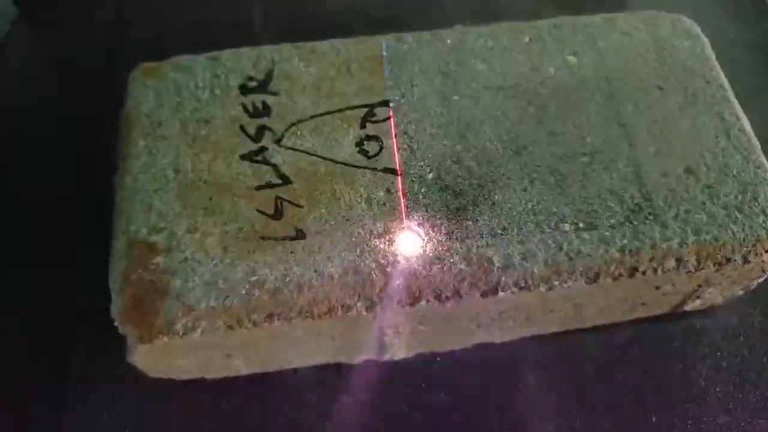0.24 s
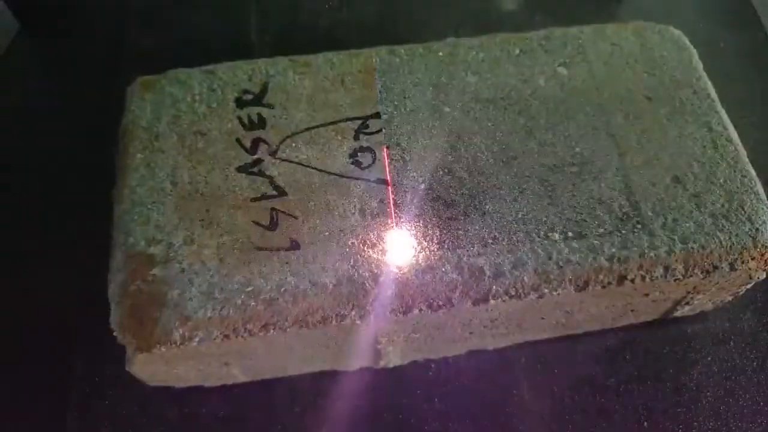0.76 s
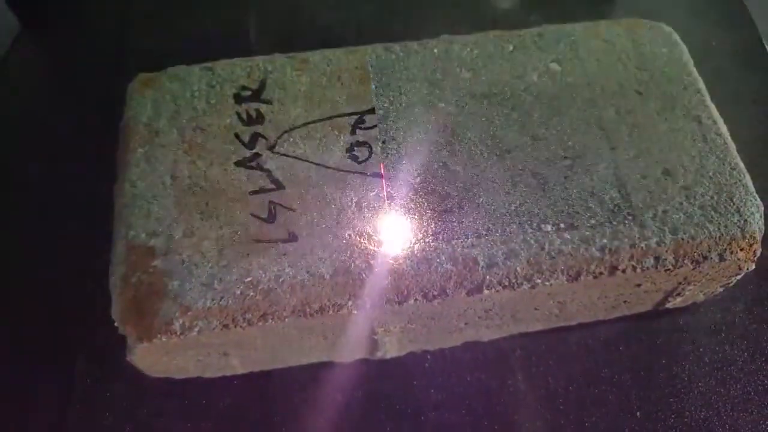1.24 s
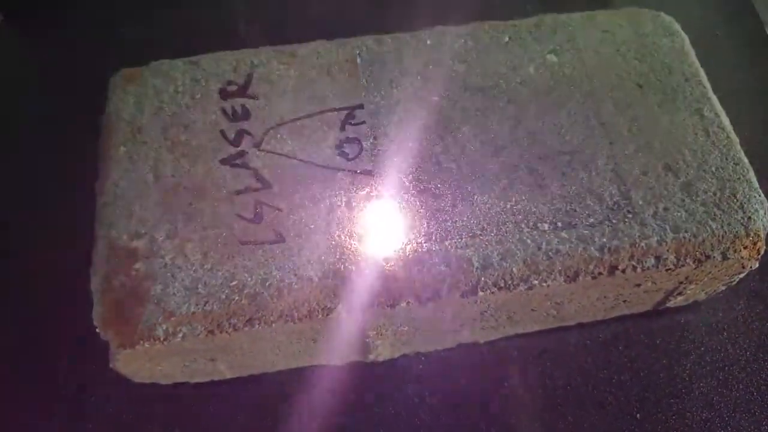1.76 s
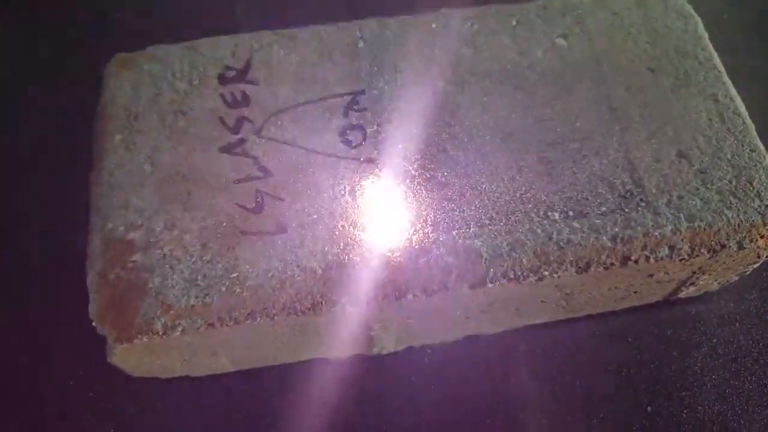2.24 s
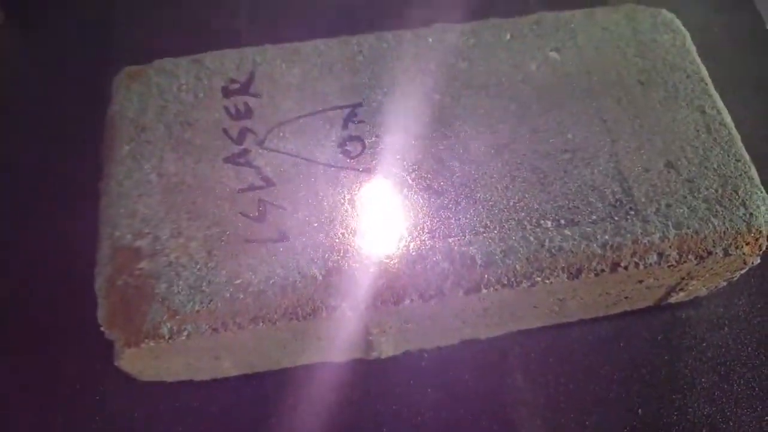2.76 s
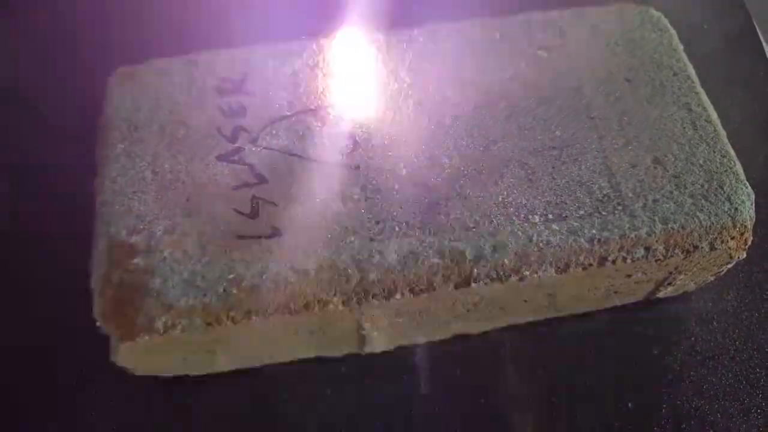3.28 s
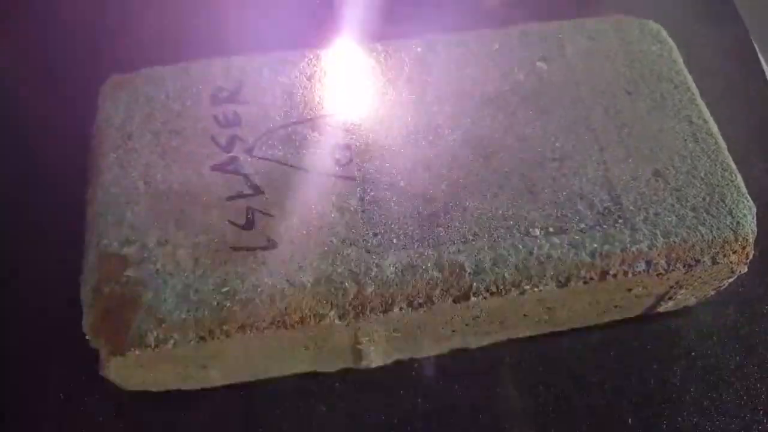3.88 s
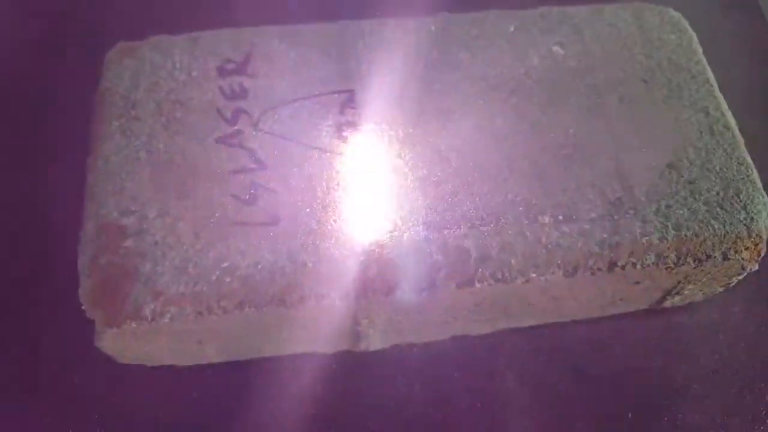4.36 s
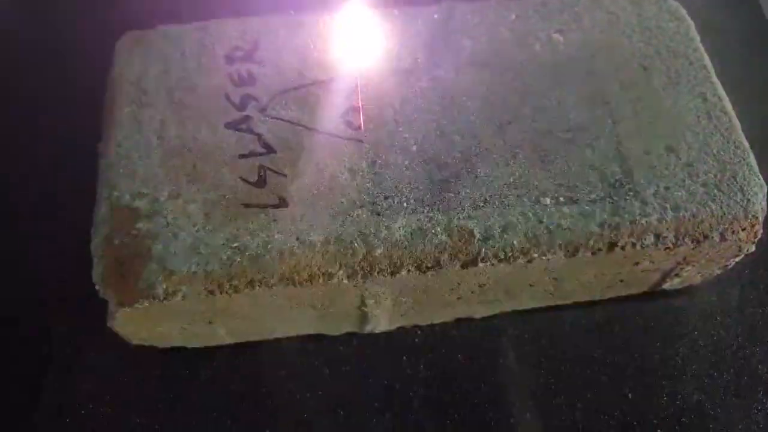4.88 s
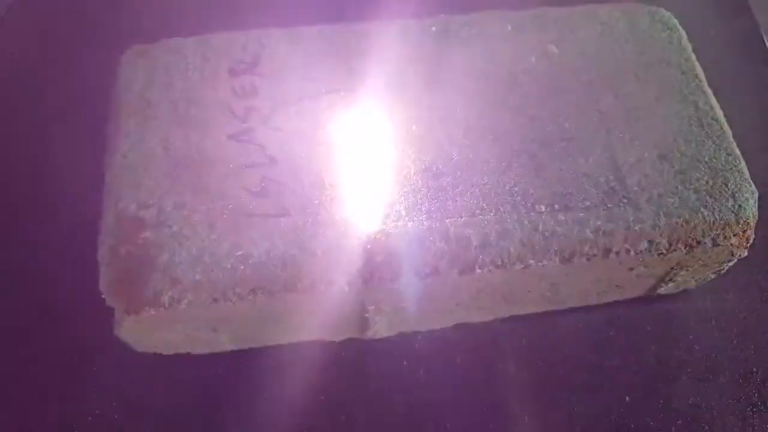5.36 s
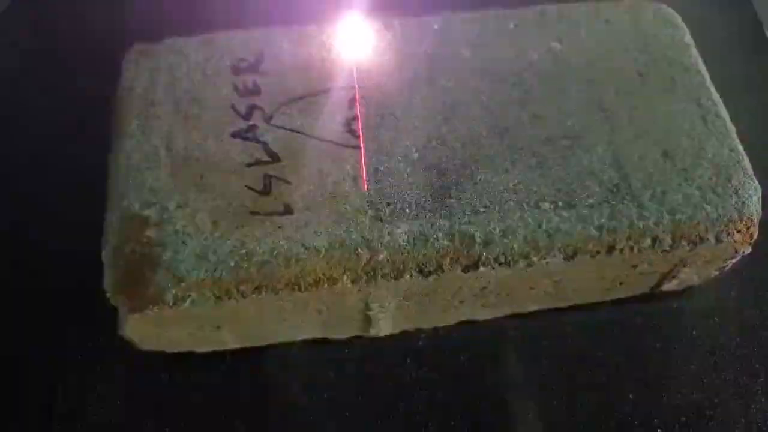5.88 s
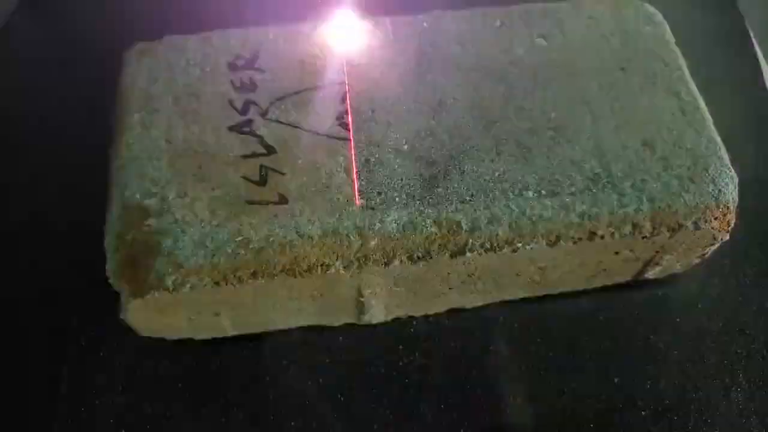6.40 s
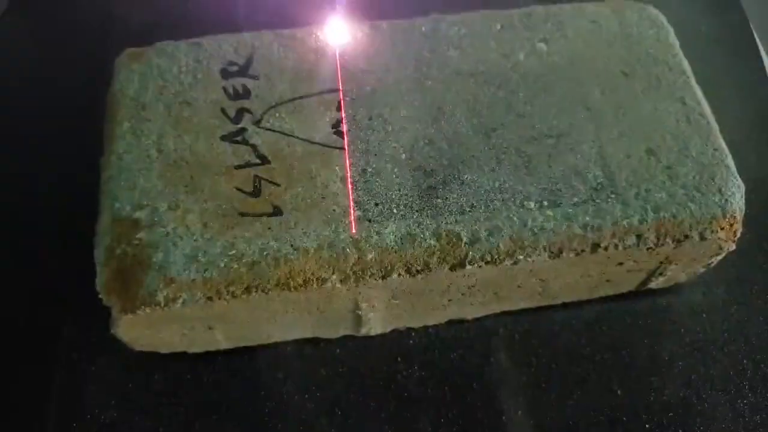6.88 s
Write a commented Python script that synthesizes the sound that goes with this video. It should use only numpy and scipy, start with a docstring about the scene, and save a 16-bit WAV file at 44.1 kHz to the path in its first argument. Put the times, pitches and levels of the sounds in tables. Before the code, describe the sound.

Close up in a small, dry workshop, a bright sizzling crackle pulses quickly and regularly as a cleaning laser blasts paint off stone. Each short burst starts with a soft tick, and the texture shifts slightly as the tool moves on, never pausing. Underneath runs the quiet, airy rush and hum of a cooling fan.

```python
"""A small dry workshop, where a handheld cleaning laser strips paint from a stone block close by.
A cooling fan runs behind. The beam sweeps one line fifteen times a second, bursting the paint in tiny
blasts, and is dark on its way back, so the crackle comes in even bursts. Each sweep crosses almost the
same grain as the one before. Block, bench and walls add short echoes; faint swells come and go."""
import sys
import numpy as np
from scipy import signal
from scipy.fft import rfft, irfft, next_fast_len
from scipy.io import wavfile
from scipy.ndimage import map_coordinates

SR = 44100
rng = np.random.default_rng(int(sys.argv[2]) if len(sys.argv) > 2 else 0)


def dump(signal):
    """Clip the signal to [-1, 1] and save it as 16-bit WAV at the path in sys.argv[1]."""
    limited = np.clip(np.atleast_2d(signal).T, -1, 1)
    pcm = np.round(limited * 32767).astype(np.int16)
    wavfile.write(sys.argv[1], SR, pcm)


N = 314874
TIME_S = np.arange(N) / SR
SWEEP_HZ, FIRST_SWEEP_S, LIT_S = 15.024, .0506, .0392


def amp(db):
    return 10 ** (np.asarray(db) / 20)


def unit_rms(x):
    return x / np.sqrt(np.mean(x ** 2) + 1e-20)


def curve_at(points, hz):
    """Read the columns of a table along its first one, a log frequency axis."""
    knots_hz, *columns = np.transpose(points)
    return np.squeeze([np.interp(np.log(hz + 1), np.log(knots_hz + 1), column) for column in columns])


def bell(x, centre, width):
    """A bump of height 1, with its width taken at half height."""
    return 2 ** -((2 * (x - centre) / width) ** 2)


def wobble(rate_hz):
    """A smooth random curve with rate_hz knots a second."""
    return map_coordinates(rng.standard_normal(int(N * rate_hz / SR) + 4), [TIME_S * rate_hz])


def filtered(x, response):
    """Shape x with a complex response of frequency."""
    size = 2 * next_fast_len((N + SR // 2) // 2)
    return irfft(rfft(x, size) * response(np.fft.rfftfreq(size, 1 / SR)), size)[..., :N]


def minimum_phase(gain):
    """The response with this gain that rings only after a pulse."""
    cepstrum = irfft(np.log(np.maximum(gain, 1e-6)))
    half = cepstrum.shape[-1] // 2
    cepstrum[..., 1:half] *= 2
    cepstrum[..., half + 1:] = 0
    return np.exp(rfft(cepstrum))


def stereo_noise(gain, side_db=-3.0, left_db=1.0):
    """Wide coloured noise of rms 1, leaning left."""
    mid, side = filtered(rng.standard_normal((2, N)), gain) * amp([[0], [side_db]])
    return unit_rms(np.array([mid + side, mid - side]) * amp([[left_db], [-left_db]]))


# EQ of the fan's rush: freq_hz, gain_db
FAN_EQ = [(20, -9), (50, -2.5), (150, -2), (230, -5), (330, 6.5), (480, 2.5), (800, 0), (2000, -8),
          (6000, -2.5), (15000, -7.5)]
# The fan's two hums: pitch_hz, width_hz, level_db
FAN_HUMS = [(91.6, 25, -67.5), (436.6, 14, -56)]
def fan(rush_db=-46, waver_db=1.3, buffet_db=3):
    """The cooler's rush of air, uneven in the bass, with two fuzzy tones."""
    hums = sum(amp(db + waver_db * wobble(5.4)) * stereo_noise(lambda hz: bell(hz, pitch, width))
               for pitch, width, db in FAN_HUMS)
    rush = amp(rush_db) * stereo_noise(lambda hz: amp(curve_at(FAN_EQ, hz)))
    bass = filtered(rush, lambda hz: bell(hz, 0, 400))
    return hums + rush + bass * (amp(buffet_db * wobble(12)) - 1)


def beam_scan():
    """Per sample: the sweep's number, its age in seconds and the spot's place on the line, 0 to 1."""
    cycles = (TIME_S - FIRST_SWEEP_S) * SWEEP_HZ + 1
    age_s = cycles % 1 / SWEEP_HZ
    return cycles.astype(int), age_s, np.minimum(age_s / LIT_S, 1)


# Texture from sweep to sweep, coarse outlasting fine: freq_hz, sweep_likeness, grain_power_share
STONE_GRAIN = [(500, .94, .85), (2000, .9, .92), (4500, .82, .82), (8000, .65, .56), (13000, .52, .58)]
def stone_grain(count, size):
    """One row of pressure per sweep: the beam reads grain that changes slowly as the hand moves on."""
    likeness, share = np.clip(curve_at(STONE_GRAIN, np.fft.rfftfreq(size, 1 / SR)), 0, .99)
    grain, fresh = rfft(rng.standard_normal((2, count, size)))
    for k in range(1, count):
        grain[k] = likeness * grain[k - 1] + np.sqrt(1 - likeness ** 2) * grain[k]
    return irfft(np.sqrt(share) * grain + np.sqrt(1 - share) * fresh, size)


# Envelope of one burst: place_on_line, gain_db
BURST_ENVELOPE = [(0, 3), (.13, 4), (.24, 4.8), (.4, 4.3), (.75, 2.6), (1, 2.1)]
def paint_bursts(spit_db=1.1, patch_db=.8, tick_s=0.00056, sway_s=6e-6):
    """Tiny blasts of paint while the beam is lit, in stereo."""
    sweep, age_s, place = beam_scan()
    rows = stone_grain(count=sweep[-1] + 1, size=2048)
    blasts = rows[sweep, np.minimum(np.round(age_s * SR).astype(int), rows.shape[1] - 1)]
    accents = rng.standard_normal((len(rows), 2))[sweep].T
    # flakes let go unevenly, in single spits and in patches
    blasts = unit_rms(blasts * amp(spit_db * wobble(5000) + patch_db * wobble(150)))
    crackle = blasts * (place < 1) * amp(np.interp(place, *np.transpose(BURST_ENVELOPE)))
    # a soft low tick of uneven strength opens each burst, and a fainter one closes it
    start_tick = 1.85 * amp(3.5 * accents[0]) * bell(age_s, tick_s, tick_s)
    end_tick = 0.5 * amp(4.9 * accents[1]) * bell(age_s, LIT_S, tick_s)
    bursts = crackle + start_tick + end_tick
    # the plume flickers from side to side, so the timing between left and right wavers
    sway = sway_s * wobble(90) * SR
    return np.array([map_coordinates(bursts, [np.arange(N) + side * sway], order=5) for side in (-1, 1)])


# Level ride of the crackle as the hand moves on: time_s, gain_db
BURN_RIDE = [(0.07, -20.9), (0.2, -22.0), (0.34, -21.4), (0.94, -20.3), (1.0, -21.2), (1.47, -20.2),
             (2.27, -22.3), (2.4, -21.4), (2.73, -22.4), (2.93, -20.9), (3.07, -21.6), (3.27, -20.3),
             (3.73, -21.6), (4.0, -19.6), (4.2, -21.4), (4.6, -19.7), (4.73, -20.8), (7.06, -20.3)]
# Extra ride on the coarse flake band: time_s, gain_db
FLAKE_RIDE = [(0.07, -3.6), (1.6, -1.3), (1.73, -4.2), (2.0, -1.9), (2.87, -3.9), (3.0, -1.6), (3.93, -3.9),
              (4.2, -0.8), (4.33, -2.7), (7.06, -2.3)]
# Band centres: puff_hz, flakes_hz, crackle_hz, sizzle_hz
BURN_BANDS = [500, 1500, 3500, 11000]
def burning_coat(gain_db=3, sizzle_fade_s=0.0012):
    """The crackle swells and changes its grain with the coat under the beam."""
    bursts = paint_bursts()
    _, age_s, _ = beam_scan()
    bands = [filtered(bursts, lambda hz: curve_at(np.c_[BURN_BANDS, solo], hz))
             for solo in np.eye(len(BURN_BANDS))]
    burn_db = np.interp(TIME_S, *np.transpose(BURN_RIDE)) + gain_db
    puff_db = np.interp(TIME_S, [3.95, 4.45], [-0.2, 1.8])  # grows once and stays
    flakes_db = np.interp(TIME_S, *np.transpose(FLAKE_RIDE)) + 0.3
    sizzle_db = -3 + 1.2 * np.exp(-age_s / sizzle_fade_s)  # brightest as the beam goes on
    return amp(burn_db) * sum(band * amp(db) for band, db in zip(bands, (puff_db, flakes_db, 0, sizzle_db)))


# EQ of the bursting paint: freq_hz, left_db, right_db
PAINT_EQ = [(60, -28, -41), (224, -27.5, -32.5), (410, -15.5, -15.5), (994, -10.5, -13.5), (1860, -2, -3),
            (2940, 1.6, -1), (5680, 1.83, -2), (7230, -1, -12), (8500, -5, -12), (9900, -1, -7.5),
            (11840, 2.3, 1), (13460, 0.5, -6.5), (14600, -6.5, -15), (15700, -4, -12)]
# Peaks and notches from near reflections, gliding up: centre_hz, width_hz, gain_db, glide_share_per_sweep
REFLECTION_PEAKS = [(2740, 87, 2, 0.013), (3190, 250, -5.5, .01), (3590, 360, 4, .015),
                    (4134, 340, -6, .015), (4610, 360, 2.5, 0.024), (6270, 190, -2, 0.036),
                    (6950, 270, -6.5, 0.046), (9120, 1000, 3, .07), (11310, 810, 7, 0.1),
                    (13250, 300, -1, 0.047)]
# The spot is heard first on the left: freq_hz, lead_rad
LEFT_LEAD = [(400, .1), (1000, .8), (2000, .25), (2500, 1.5), (3200, 2.3), (3700, 1.4), (4500, 1.9),
             (6500, 2.9), (9500, 3.7), (11600, 3.4), (12200, 4.8), (14000, 5.6)]
def spot_response(hz, offset=0, depth=1):
    """Colour and timing of the spot, left and right; offset runs from -.5 to .5 along the line."""
    peaks_db = sum(gain * bell(hz, centre * (1 + glide * offset), width)
                   for centre, width, gain, glide in REFLECTION_PEAKS)
    eq_db = curve_at(PAINT_EQ, hz) + depth * peaks_db
    mid_db = eq_db.mean(0)
    lead = np.exp(.5j * curve_at(LEFT_LEAD, hz) * np.array([[1], [-1]]))
    return minimum_phase(amp(mid_db)) * amp(eq_db - mid_db) * lead


def reverb(x, t60, predelay_s):
    """Play x through a fresh stereo tail of decaying noise; t60 gives seconds for each frequency."""
    hz, t, spectrum = signal.stft(rng.standard_normal((2, SR // 5)), SR, nperseg=128)
    tail = signal.istft(spectrum * amp(-60 * t / t60(hz)[:, None]), SR, nperseg=128)[1]
    tail *= np.arange(tail.shape[1]) / SR > predelay_s
    return signal.oaconvolve(x, tail / np.linalg.norm(tail, axis=1, keepdims=True), axes=1)[:, :N]


def moving_echoes(x, t60, predelay_s, hand_hz=1.619, turns_per_sweep=0.55, tails=6):
    """The pattern of echoes changes with the spot: fast along the line, slowly with the hand."""
    _, _, place = beam_scan()
    angles = [2 * np.pi * (turns_per_sweep * place + rng.random()) + 1.41 * wobble(hand_hz)
              for _ in range(tails)]
    weights = np.cos(angles) / np.linalg.norm(np.cos(angles), axis=0)
    return sum(reverb(x * weight, t60, predelay_s) for weight in weights)


# Decay of the dry workshop: freq_hz, t60_s
ROOM_DECAY = [(200, 0.053), (1500, 0.081), (5000, 0.076), (14000, 0.077)]
def laser(near_db=-10, near_t60_s=0.02, room_db=-3.5):
    """The crackle of the moving spot, heard directly and off the surfaces around it."""
    crackle = burning_coat()
    _, _, place = beam_scan()
    # the colour slides from the near end of the line through its middle to the far end
    direct = 0
    for offset in (-.5, 0, .5):
        crossfade = np.maximum(1 - 2 * abs(place - .5 - offset), 0)
        direct += filtered(crackle * crossfade, lambda hz: spot_response(hz, offset))
    # the block and the tool's head answer at once
    near = moving_echoes(direct, lambda hz: np.full(len(hz), near_t60_s), predelay_s=0.00037)
    # bench and walls follow from all sides, so their colour is smoother
    diffuse = filtered(crackle, lambda hz: spot_response(hz, depth=0.44))
    walls = moving_echoes(diffuse, lambda hz: curve_at(ROOM_DECAY, hz), predelay_s=0.0014)
    return direct + amp(near_db) * near + amp(room_db) * walls


# Low swells and brief tones in the room: peak_s, length_s, pitch_hz, width_hz, level_db
ROOM_SWELLS = [(.56, .18, 905, 14, -50), (1.26, .15, 240, 240, -47), (1.72, .24, 903, 14, -51),
               (5.5, .9, 60, 12, -62)]
def room_swells():
    """Faint narrow bands of noise that come and go behind the work."""
    return sum(amp(db) * bell(TIME_S, peak_s, length_s) * stereo_noise(lambda hz: bell(hz, pitch, width))
               for peak_s, length_s, pitch, width, db in ROOM_SWELLS)


def scene():
    return laser() + fan() + room_swells()


def record(dry):
    """A steep high cut takes off the very top of the sizzle."""
    cutoff_hz = 15850
    return filtered(dry, lambda hz: 1 / (1 + (hz / cutoff_hz) ** 200))


dry = scene()
out = record(dry)
dump(out)
```